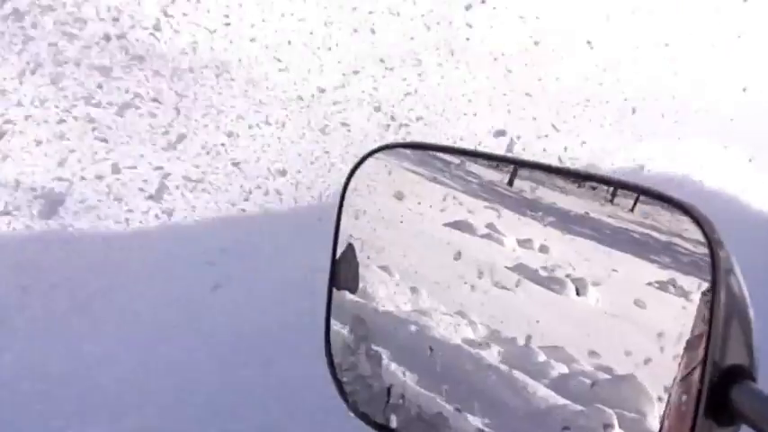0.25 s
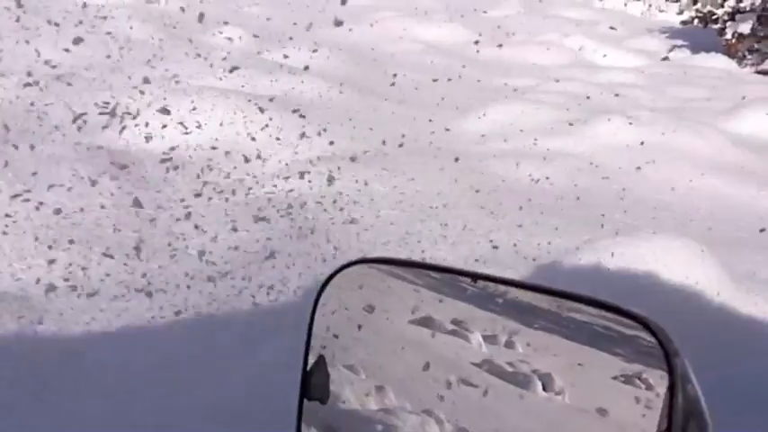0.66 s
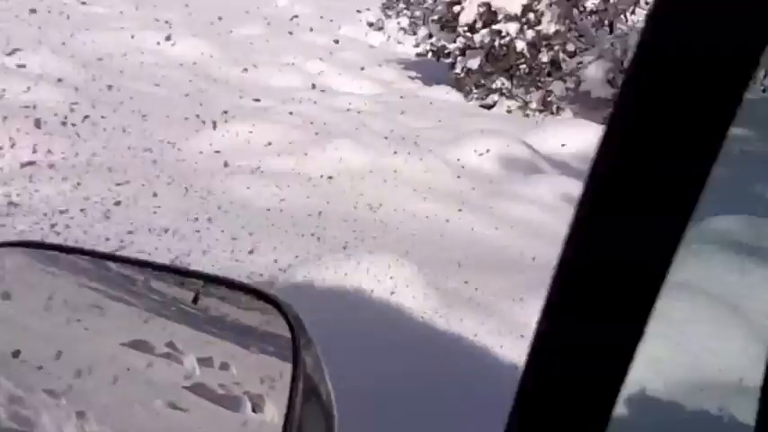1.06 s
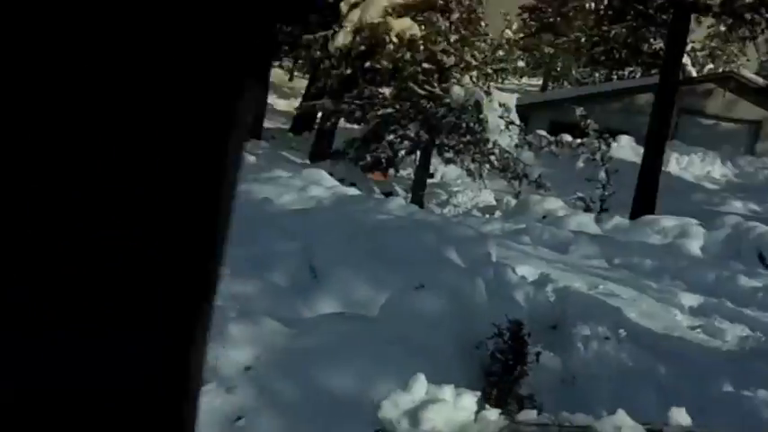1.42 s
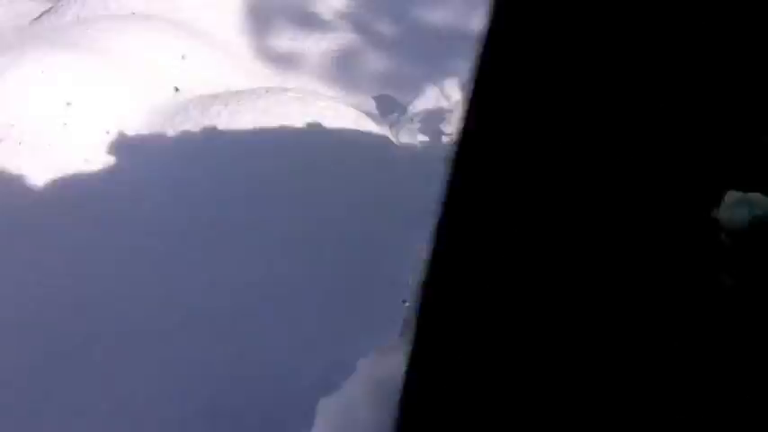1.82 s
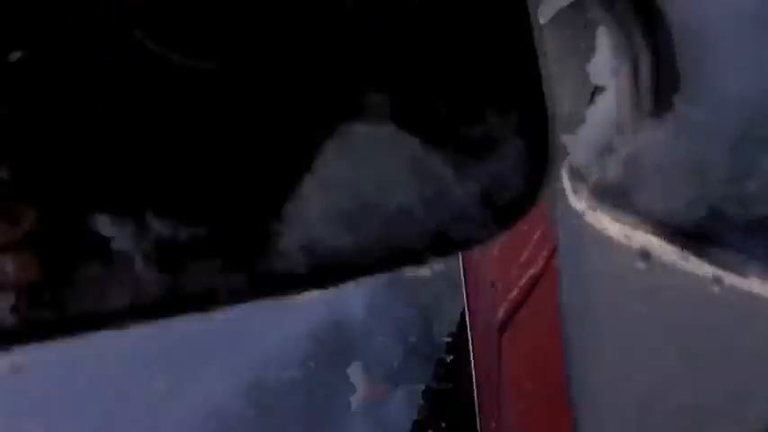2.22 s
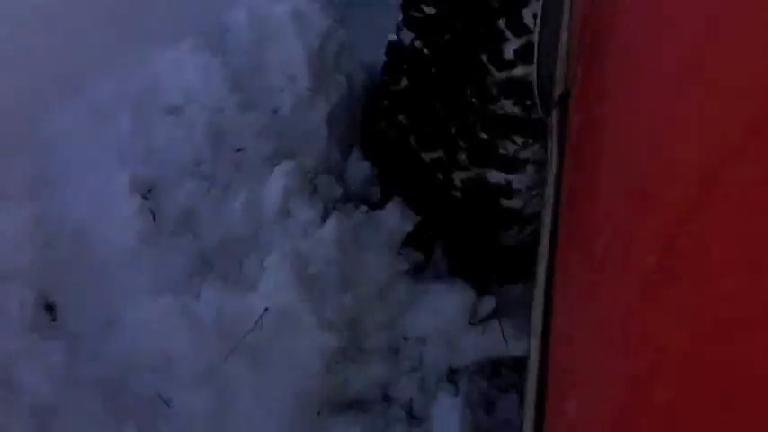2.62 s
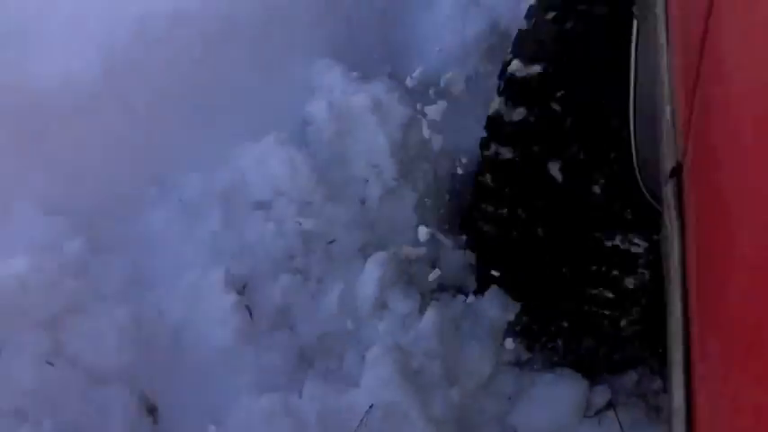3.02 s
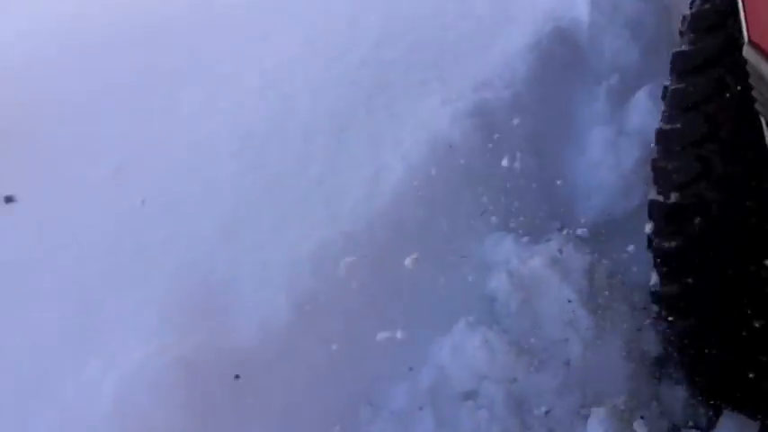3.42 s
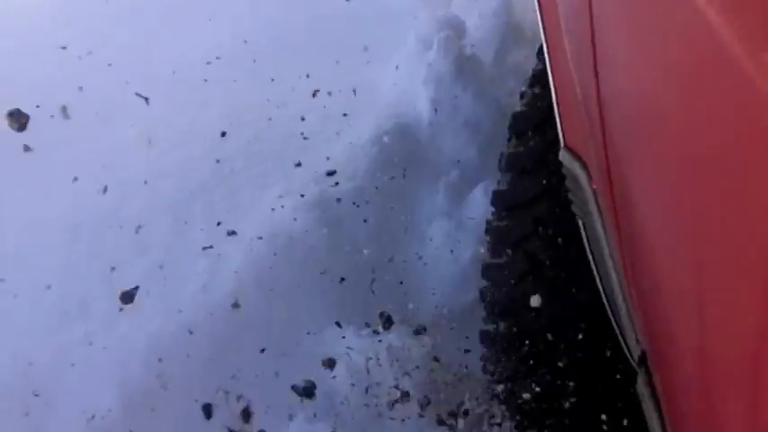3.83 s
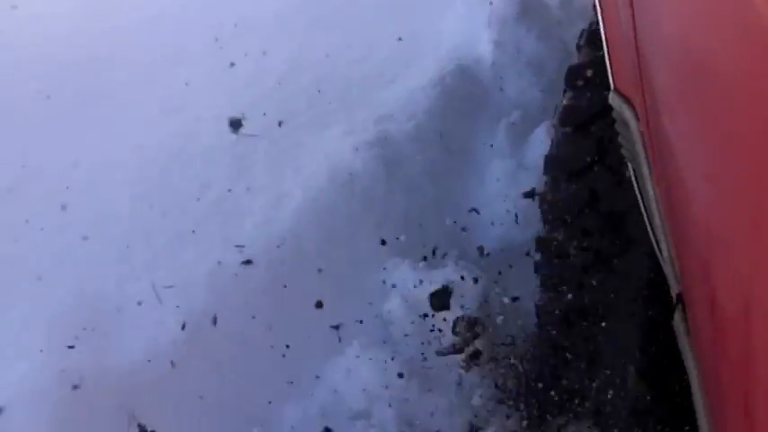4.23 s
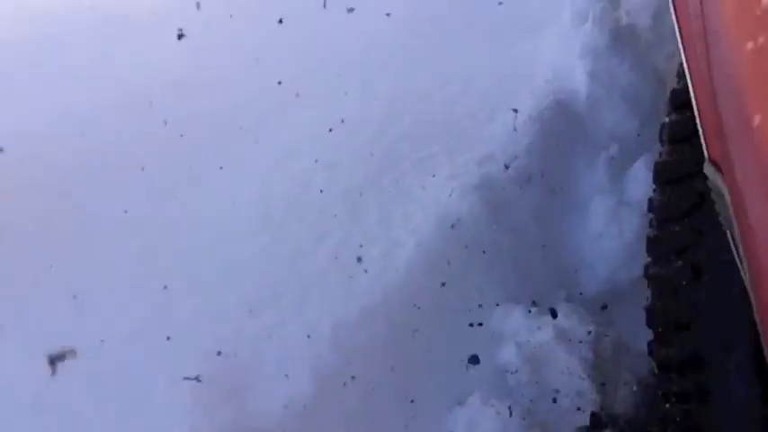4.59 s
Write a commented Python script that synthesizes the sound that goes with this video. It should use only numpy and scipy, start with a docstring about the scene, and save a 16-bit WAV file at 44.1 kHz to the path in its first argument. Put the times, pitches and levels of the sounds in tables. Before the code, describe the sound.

A stuck truck's big engine throbs inside the cab, then outside its spinning tyre churns deep snow and pelts the bodywork with ice and clods.

```python
"""Tyre spinning in deep snow

A V8 pickup is stuck; we hear it first from the cab, then leaning out over the wheel, on one small microphone.
Lines at multiples of the engine cycle make the exhaust burble; noise and sawtooth beats make the cab throb.
Noise and showers of tiny impacts make the tread churn snow and fling ice and grit.
Bursts of noise through panel and wheel-arch resonances make clods smack and lumps thud; a sleeve brushes by."""
import sys
import numpy as np
from scipy import signal
from scipy.fft import rfft, irfft, next_fast_len
from scipy.io import wavfile
from scipy.ndimage import uniform_filter1d, map_coordinates

SR = 44100
rng = np.random.default_rng(int(sys.argv[2]) if len(sys.argv) > 2 else 0)


def store_pcm(level_fs):
    """Save levels as 16-bit WAV."""
    pcm = np.round(np.clip(level_fs, -1, 1) * 32767).astype(np.int16)
    wavfile.write(sys.argv[1], SR, np.atleast_2d(pcm).T)


N = 214145


def amp(db):
    """Decibels to gain."""
    return 10 ** (np.asarray(db) / 20)


def unit(x):
    """Scale to rms 1."""
    return x / np.sqrt(np.mean(x ** 2) + 1e-20)


def curves(rows):
    """One value per sample for each column after the time."""
    s, *cols = np.transpose(rows)
    return [np.interp(np.arange(N) / SR, s, c) for c in cols]


def ramp(span):
    """Rises from 0 to 1 between two times."""
    return np.interp(np.arange(N) / SR, span, [0, 1])


def swells(rows):
    """Bell-shaped rises in dB, one per row."""
    t = np.arange(N) / SR
    return sum(db * np.exp(-((t - s) / half) ** 2) for s, half, db in rows)


def wobble(rate):
    """A smooth random curve, rate knots a second."""
    knots = rng.standard_normal(int(N * rate / SR) + 4)
    return map_coordinates(knots, [np.arange(N) * rate / SR])


def filtered(x, response):
    """x times a response of frequency."""
    m = next_fast_len(len(x) + 8192)
    return irfft(rfft(x, m) * response(np.fft.rfftfreq(m, 1 / SR)), m)[:len(x)]


def resonances(f, rows):
    """Sum of resonances of alternating sign, one per row: pitch_hz, width_hz, level_db."""
    total = 0
    for k, (hz, width, db) in enumerate(rows):
        total = total + (-1) ** k * amp(db) * 1j * f * width / (hz * hz - f * f + 1j * f * width)
    return total


def colour(x, points):
    """Causal filter of unit power that follows (Hz, dB) points and falls off above the last."""
    size = 16384
    hz, db = np.transpose(list(points) + [(2 * points[-1][0], -120)])
    gain = amp(np.interp(np.log(np.fft.rfftfreq(size, 1 / SR) + 1), np.log(hz), db))
    # folding the cepstrum gives minimum phase
    cepstrum = irfft(np.log(gain))
    fold = np.r_[1, np.full(size // 2 - 1, 2), 1, np.zeros(size // 2 - 1)]
    ring = irfft(np.exp(rfft(cepstrum * fold)))
    return signal.fftconvolve(x, ring / np.linalg.norm(ring))[:len(x)]


def grains(rate, spread_db):
    """Random tiny impacts of rms 1, rate a second, with scattered sizes."""
    struck = rng.random(N) < rate / SR
    size = amp(spread_db * np.clip(rng.standard_normal(N), -2, 2))
    return unit(struck * size * rng.choice([-1, 1], N))


def chips(lo_hz, hi_hz, cycles, spread_db, count):
    """Fragments that each ring briefly at their own pitch, many small; as strong in their band as white noise."""
    s, pitch, size, side = rng.random((count, 4)).T[:, :, None]
    hz = lo_hz + (hi_hz - lo_hz) * pitch
    t = np.arange(int(cycles / lo_hz * SR)) / SR
    decay = amp(spread_db * size ** 3 - 60 * hz * t / cycles)
    ring = np.sign(side - .5) * np.sqrt(hz) * decay * np.sin(2 * np.pi * hz * t)
    at = (s * N).astype(int) + np.arange(len(t))
    return unit(np.bincount(at.ravel(), ring.ravel(), N)[:N]) * np.sqrt(2 * abs(hi_hz - lo_hz) / SR)


def add(track, s, sound):
    """Mix a sound into the track at s seconds."""
    part = track[round(s * SR):][:len(sound)]
    part += sound[:len(part)]


# engine speed: start_s, cycle_rate_hz
ENGINE_SPEED = [(0, 18.3), (.22, 19.3), (.35, 19.25), (.46, 18.1), (.58, 16.15), (.7, 14.9), (.92, 13.5),
                (1.6, 13.2), (2.08, 13.27), (2.5, 11.52), (2.62, 11.57), (2.98, 12.85), (3.22, 14.65),
                (3.45, 16.85), (3.58, 17.08), (3.72, 16.75), (3.82, 15.35), (3.96, 13.9), (4.15, 12.9),
                (4.86, 11.85)]
# throttle, as engine load: start_s, load_db
THROTTLE = [(.45, 2.5), (.9, -8.5), (1.5, -1), (2.0, 2.5), (2.8, -.5), (3.05, 1.5), (3.25, 1), (3.7, -1.5),
            (4.05, -4.5), (4.3, -1), (4.86, 0)]
# weaker exhaust lines: cycle_multiple, level_db (before their common weak level)
WEAK_LINES = [(3, -12), (4, -19), (6, -15), (7, -13), (9, -21), (11, -18), (13, -20), (14, -26),
              (15, -23.5)]
# strength of a line at its pitch, beside the truck and inside the cab: pitch_hz, level_db
PIPE_BESIDE = [(56, -29), (65, -21), (73, -24), (84, -22.5), (92, -19.5), (100, -23), (110, -32.5),
               (130, -23.5), (170, -33.5)]
PIPE_FROM_CAB = [(62, -44.5), (67, -44.5), (76, -46), (94, -29), (106, -34), (113, -34.5), (135, -35.5),
                 (155, -41.5), (190, -38.5)]


def exhaust(revs, load_db, outside, octave_db=-5, weak_db=-22, weak_in_cab_db=-13):
    """Eight firings a cycle; the uneven order of each bank adds a strong fifth line, its octave and weaker lines."""
    turn = np.cumsum(revs) / SR

    def line(order, waver_db):
        phase = 2 * np.pi * (order * turn + rng.random()) + .09 * wobble(25)
        return np.sqrt(2) * np.sin(phase) * amp(waver_db * wobble(14))

    def level(order):
        # a strong line swells as the revs carry it through the resonances of the pipe and the cab
        beside_db = np.interp(order * revs, *np.transpose(PIPE_BESIDE))
        from_cab_db = np.interp(order * revs, *np.transpose(PIPE_FROM_CAB))
        return amp(load_db + outside * beside_db + (1 - outside) * from_cab_db)

    burble = level(order=5) * line(5, waver_db=.8)
    firing = level(order=8) * line(8, waver_db=.8)
    octave = amp(octave_db) * level(order=10) * line(10, waver_db=.8)
    weak = sum(amp(db) * line(round(multiple), waver_db=3.5) for multiple, db in WEAK_LINES)
    return burble + firing + octave + amp(weak_db + weak_in_cab_db * (1 - outside)) * weak


# pace of the throb in the cab: start_s, beat_rate_hz
BEAT_PACE = [(0, 9.15), (.55, 9.05), (.72, 9.8), (1.05, 9.8), (1.18, 8.87), (1.4, 8.87), (1.6, 8.47),
             (2.0, 8.5), (2.15, 10)]
FIRST_BEAT_S = 0.03


def count_beats():
    """Running count of the cab's beats, whole at each beat."""
    pace, = curves(BEAT_PACE)
    return np.cumsum(pace) / SR - FIRST_BEAT_S * pace[0]


# lines of the throb: beat_multiple, smooth_level_db, shudder_level_db
THROB_LINES = [(1, -17, -20.5), (2, -27.5, -22), (3, -50, -36), (4, -46, -40), (5, -50, -42.5),
               (6, -48, -43.5)]
# the smooth throb hardens to a shudder: start_s, end_s
HARDENING_S = (0.97, 1.27)
THROB_OUTSIDE_DB = -15  # against inside


def cab_throb(beats, outside):
    """Air in the shaking cab throbs in sawtooth beats, a sum of harmonics of the beat."""
    shudder = ramp(HARDENING_S)
    throb = 0
    for k, smooth_db, hard_db in THROB_LINES:
        gain = amp(smooth_db + (hard_db - smooth_db) * shudder)
        throb = throb + gain * np.sin(2 * np.pi * round(k) * beats)
    return amp(THROB_OUTSIDE_DB * outside) * np.sqrt(2) * throb


# spectrum of the microphone's crackle: pitch_hz, level_db
CRACKLE_SPECTRUM = [(200, -5), (700, 5), (3000, -14), (5000, -23), (12000, -24)]
CRACKLE_DB = -58


def overload_crackle(beats, outside, lead=0.16):
    """In the cab the small microphone crackles as it overloads on each beat of the throb: gated grains."""
    gate = np.exp(-(((beats + lead + .5) % 1 - .5) / .08) ** 2)
    crackle = unit(amp(1.5 * wobble(8)) * colour(grains(rate=1800, spread_db=3), CRACKLE_SPECTRUM))
    return amp(CRACKLE_DB) * (1 - outside) * gate * crackle


def lugging(revs, outside):
    """How far the engine lugs at low revs, as felt in the cab, 0 to 1."""
    return (1 - outside) * (revs.max() - revs) / np.ptp(revs)


# spectrum of the low rumble: pitch_hz, level_db
RUMBLE_SPECTRUM = [(10, -29), (22, -7), (36, 9), (55, -5), (85, -6), (130, -15.5), (220, -38)]
# base level and rise when lugging (dB), then dB per dB of load
RUMBLE_DB, RUMBLE_LUG_DB, RUMBLE_PER_LOAD = -31.5, 8, 0.92
# the harder the tyre bites, the more it shakes the truck (dB per dB); outside against inside (dB)
RUMBLE_PER_BITE, RUMBLE_OUTSIDE_DB = 0.14, -0.5


def cab_rumble(revs, load_db, bite_db, beats, outside, pump_db=0.5):
    """Low noise that pumps with the beats inside the cab and grows as the engine lugs."""
    level_db = RUMBLE_DB + RUMBLE_LUG_DB * lugging(revs, outside) + RUMBLE_PER_LOAD * load_db
    level_db = level_db + RUMBLE_PER_BITE * bite_db + RUMBLE_OUTSIDE_DB * outside
    pump = amp(pump_db * (1 - outside) * np.cos(2 * np.pi * beats))
    return amp(level_db) * unit(colour(rng.standard_normal(N) * pump, RUMBLE_SPECTRUM))


# spectrum of the body drone: pitch_hz, level_db
DRONE_SPECTRUM = [(50, -20), (100, -15), (140, -10), (175, 2.5), (220, -4), (320, -18), (800, -47.5)]
# base level and rise when lugging (dB), then dB per dB of load and of bite
DRONE_DB, DRONE_LUG_DB, DRONE_PER_LOAD, DRONE_PER_BITE = -34.5, 11, 0.4, 0.92
DRONE_PER_SLAB = 0.35  # a dragged slab also booms through the body (dB per dB of swell)


def body_drone(revs, load_db, bite_db, outside):
    """The body drones: noise that pulses in step with the firings."""
    level_db = DRONE_DB + DRONE_LUG_DB * lugging(revs, outside) + DRONE_PER_LOAD * load_db
    level_db = level_db + DRONE_PER_BITE * bite_db + DRONE_PER_SLAB * swells(DRAGGED_SLABS)
    firing = 1 + .45 * np.cos(2 * np.pi * 8 * np.cumsum(revs) / SR)
    return amp(level_db) * unit(colour(rng.standard_normal(N) * firing, DRONE_SPECTRUM))


# spectrum of the fan and intake: pitch_hz, level_db
FAN_SPECTRUM = [(500, 0.5), (1000, 5.5), (1400, -5), (2100, -5.5), (3200, -17), (4500, -22), (7000, -18),
                (12000, -25)]
FAN_DB, FAN_PER_LOAD = -60, 0.68  # base level (dB), dB per dB of load


def fan_and_intake(load_db):
    """The engine's fan and intake add a fine, even rush that follows the throttle."""
    return amp(FAN_DB + FAN_PER_LOAD * load_db) * unit(colour(rng.standard_normal(N), FAN_SPECTRUM))


# how hard the tread digs in: start_s, bite_db (against a full bite)
TREAD_BITE = [(0, -13), (.45, -10), (.75, -17), (1.1, -19.5), (1.9, -12.5), (2.15, -10), (2.33, -12),
              (2.5, -8), (2.79, -8), (2.87, -1), (3.5, 0.5), (3.99, 0.5), (4.07, -8.5), (4.2, 0),
              (4.42, -0.5), (4.54, -5.5), (4.86, -6)]
# slabs of snow dragged under the tread: centre_s, half_length_s, swell_db
DRAGGED_SLABS = [(2.5, 0.08, 3), (2.69, 0.025, 6.5), (3.52, 0.028, 3.5), (4.205, 0.042, 6),
                 (4.64, 0.047, 7), (4.83, 0.038, 5.5)]
# spectrum of the churned snow: pitch_hz, level_db
CHURN_SPECTRUM = [(120, -22), (220, -3.5), (270, -3.5), (340, 0), (400, -6), (450, -4.5), (510, -8.5),
                  (640, -7.5), (980, -15), (1250, -24), (2000, -29.5)]
# level at a full bite (dB), dB per dB of bite, change in the cab (dB)
CHURN_DB, CHURN_PER_BITE, CHURN_IN_CAB_DB = -33, 0.9, -1


def snow_churn(bite_db, clumps, outside, chunks_db=-2):
    """Tread blocks tear the snow in clumps: small grains, and larger ringing chunks heard outside."""
    level_db = CHURN_DB + CHURN_PER_BITE * bite_db + CHURN_IN_CAB_DB * (1 - outside) + swells(DRAGGED_SLABS)
    chunks = amp(chunks_db) * chips(lo_hz=265, hi_hz=1386, cycles=11.0, spread_db=8, count=1500)
    tearing = amp(outside * (1.5 * clumps + 1.5 * wobble(130)))
    torn = (grains(rate=9000, spread_db=3) + outside * chunks) * tearing
    return amp(level_db) * unit(colour(torn, CHURN_SPECTRUM))


# spectra of coarse spray, fine ice and brightest powder, and the cab's dulling: pitch_hz, level_db
SPRAY_SPECTRUM = [(400, -46.5), (900, 8), (1400, 3.5), (2000, 4), (2800, 0), (4200, -2.5), (5500, -16.5),
                  (8000, -24.5)]
ICE_SPECTRUM = [(2000, -5.5), (4000, -9.5), (6000, 0), (7300, -3.5), (9000, -11.5), (11000, -16.5),
                (13000, -17.5), (15000, -34.5)]
POWDER_SPECTRUM = [(5000, -5), (8500, 12.5), (10500, -12.5), (13000, -19), (15000, -29)]
CAB_MUFFLE = [(1500, -2.5), (2500, -2), (4500, -5), (9000, -31)]
# patches of ice and grit ripped loose: centre_s, half_length_s, swell_db
ICE_SHOWERS = [(3.98, 0.069, 6), (4.42, 0.075, 3.5)]
# the tread wears through the snow to the dirt: start_s, end_s
REACHES_DIRT_S = (3.77, 3.79)
SPRAY_DB = -42.5  # at a full bite
# level at a full bite (dB), dB per dB of bite, changes in the cab and on dirt (dB)
ICE_DB, ICE_PER_BITE, ICE_IN_CAB_DB, ICE_ON_DIRT_DB = -47, 1, -7, 2.5
ICE_TOP_REVS_DB = -0.5  # further change in the cab at top revs


def spray_and_ice(revs, bite_db, clumps, outside, powder_db=-10.0, powder_growth=2.2, window_db=-13,
                  clump_db=1.66, flutter_db=1.34):
    """The tread throws off showers of noise and ringing fragments, louder the harder it bites."""
    fast = (revs - revs.min()) / np.ptp(revs)
    shelter_db = (1 - outside) * (ICE_IN_CAB_DB + ICE_TOP_REVS_DB * fast)
    ice_db = ICE_DB + ICE_PER_BITE * bite_db + shelter_db
    ice_db = ice_db + ICE_ON_DIRT_DB * ramp(REACHES_DIRT_S) + swells(ICE_SHOWERS)
    pellets = .9 * chips(lo_hz=1200, hi_hz=5200, cycles=17, spread_db=12, count=4500)
    splinters = .8 * chips(lo_hz=4000, hi_hz=14000, cycles=20, spread_db=11, count=9000)
    # coarse grit and fine ice leave the tread in the same short bursts
    bursts = amp(outside * (clump_db * clumps + flutter_db * wobble(260)))

    def shower(spectrum, pieces):
        return unit(colour((rng.standard_normal(N) + outside * pieces) * bursts, spectrum))

    spray = shower(SPRAY_SPECTRUM, pellets)
    # the cab dulls the spray, but for what comes through the open window
    direct = np.clip(outside + amp(window_db) * (1 - outside), 0, 1)
    spray = direct * spray + (1 - direct) * unit(colour(spray, CAB_MUFFLE))
    ice = amp(ice_db) * shower(ICE_SPECTRUM, splinters)
    # the hardest throws shatter the ice to a brighter powder
    loudest_db = ice_db.max()
    powder_level = amp(loudest_db + powder_db + powder_growth * (ice_db - loudest_db))
    return amp(SPRAY_DB + bite_db) * spray + ice + powder_level * shower(POWDER_SPECTRUM, 0)


GRIT_DB, GRIT_ON_DIRT_DB = -62, 13  # level at a full bite, rise once the dirt is reached


def grit_patter(bite_db, outside, grit_per_bite=0.83, in_cab_db=-66):
    """Bits of grit tick on panels, each at its own pitch; inside the cab only a faint, dull patter remains."""
    ticks = chips(lo_hz=1800, hi_hz=11000, cycles=10, spread_db=18, count=1000)
    # the patter follows the bite smoothed over a quarter second, so it bridges the lulls
    smoothed_bite_db = uniform_filter1d(bite_db, SR // 4)
    grit_db = GRIT_DB + grit_per_bite * smoothed_bite_db + GRIT_ON_DIRT_DB * ramp(REACHES_DIRT_S)
    dull = chips(lo_hz=900, hi_hz=3800, cycles=5, spread_db=9, count=350)
    return outside * amp(grit_db) * unit(ticks) + (1 - outside) * amp(in_cab_db) * unit(dull)


# clods and stones on the bodywork: start_s, level_db (before the common trim), pitch_hz, spread_octaves, t60_s
BODY_CLODS = [(1.4078, -31, 9000, 1.6, .004), (1.4303, -22.5, 5650, 0.42, 0.014),
              (1.431, -33.5, 2000, 0.91, 0.021), (1.5912, -40, 3630, 0.66, 0.013),
              (1.685, -40, 4620, 0.83, 0.0088), (2.0893, -34, 7000, 0.89, 0.0043),
              (2.5273, -17.5, 5500, 0.49, 0.01), (3.1553, -26.5, 3550, 0.71, 0.021),
              (3.3249, -27.5, 6750, 0.45, 0.026), (3.365, -33, 7660, 0.22, 0.021),
              (3.425, -24.5, 5900, 0.42, 0.028), (3.5213, -21, 6140, 0.35, 0.023),
              (3.579, -24, 7340, 0.25, 0.016), (3.6776, -33, 8550, 0.48, 0.012),
              (3.727, -24, 6200, 0.48, 0.015), (3.887, -28, 8100, 1, 0.0079),
              (3.9143, -26.5, 8000, 0.12, 0.025), (3.955, -22, 7000, 0.31, 0.013),
              (3.974, -13, 4850, 1.6, 0.014), (3.9824, -25, 7500, 0.45, 0.017),
              (4.001, -17.5, 7300, 0.18, 0.024), (4.014, -35, 6100, 0.51, .02),
              (4.049, -23.5, 6260, 0.22, 0.02), (4.135, -17, 5100, 0.89, 0.018),
              (4.198, -20, 3000, 1, 0.011), (4.2448, -21.5, 5500, 0.73, 0.035),
              (4.3647, -22, 5240, 0.81, 0.019), (4.399, -24, 3570, 0.69, 0.017),
              (4.422, -23, 9250, 1.2, .008), (4.462, -24, 5930, 0.84, 0.011),
              (4.477, -25, 7850, 0.27, 0.0087), (4.4868, -21, 8400, 0.39, 0.0071),
              (4.5113, -18.5, 5850, 1.0, 0.03), (4.5744, -22, 6860, 0.59, 0.033),
              (4.62, -25.5, 6800, 0.7, 0.015), (4.674, -21.5, 3720, 0.68, 0.027),
              (4.7282, -12.5, 6640, 0.42, 0.0061), (4.733, -22.5, 6760, 1, 0.0096),
              (4.7822, -29.5, 6950, 0.3, 0.0087)]


def clods(crumble_t60=0.05, crumble_db=-21, grit_db=3, skirt_db=-24, crack=0.48, trim_db=-8.5):
    """Each clod smacks a different spot of the panels with a sharp crack and sheds a short trail of crumbs."""
    smacks = np.zeros(N)
    t = np.arange(SR // 10) / SR
    bands = np.geomspace(250, 15000, 32)
    for s, db, hz, octaves, t60 in BODY_CLODS:
        shape = amp(-60 * t / t60) + amp(crumble_db - 60 * t / crumble_t60)
        pieces = np.interp(t, np.linspace(0, t[-1], 120), rng.standard_normal(120))
        broken = unit(shape * amp(grit_db * pieces) * rng.standard_normal(len(t)))
        smack = broken * np.sqrt(np.mean(shape ** 2))
        smack[0] += crack * np.linalg.norm(smack)
        power = (np.exp(-(np.log2(bands / hz) / octaves) ** 2) + amp(skirt_db) ** 2) / bands
        panel_db = 10 * np.log10(power / power.max()) + rng.standard_normal(len(bands))
        add(smacks, s, amp(db + trim_db) * colour(smack, list(zip(bands, panel_db))))
    return smacks


# resonances of the door trim: pitch_hz, width_hz, level_db
DOOR_TRIM = [(590, 57, 1), (946, 54, 2.5), (1336, 90, -14), (1860, 130, -13.5), (2630, 140, -18.5),
             (3900, 500, -24)]
KNOCK_S, KNOCK_DB = 1.4785, -27.5  # start, peak


def door_knock(contact_t60=0.011, tail_db=-24, tail_t60=0.1):
    """Something knocks once on the door trim: a click and decaying noise ring its resonances."""
    track = np.zeros(N)
    t = np.arange(SR // 8) / SR
    decay = amp(-60 * t / contact_t60) + amp(tail_db - 60 * t / tail_t60)
    contact = decay * rng.standard_normal(len(t))
    click = 2 * (t == 0)
    knock = filtered(contact / np.linalg.norm(contact) + click, lambda f: resonances(f, DOOR_TRIM))
    add(track, KNOCK_S, amp(KNOCK_DB) * knock / np.abs(knock).max())
    return track


# spectrum of a sleeve on the window frame: pitch_hz, level_db
SLEEVE = [(150, -9.5), (228, 9), (275, -6.5), (345, 0.5), (480, -10.5), (900, -14.5), (1300, -24.5),
          (2000, -36.5)]
BRUSH_S, BRUSH_DB, BRUSH_RISE_S, BRUSH_FALL_S = 2.117, -27.5, .045, .048  # centre, level, half lengths


def sleeve_brush():
    """A sleeve brushes over the window frame: coloured noise that swells and fades."""
    since = np.arange(N) / SR - BRUSH_S
    swell = 1 / (1 + (since / np.where(since < 0, BRUSH_RISE_S, BRUSH_FALL_S)) ** 4)
    return amp(BRUSH_DB) * swell * unit(colour(rng.standard_normal(N), SLEEVE))


# heavy lumps of snow on the truck: start_s, level_db (before trim and softening), hardness_db
SNOW_LUMPS = [(2.929, -13, -18), (3.05, -14, -23), (3.247, -11.5, -32), (3.501, -10, -15)]
# resonances of the hollow wheel arch: pitch_hz, width_hz, level_db (before the tilt for hardness)
WHEEL_ARCH = [(207, 21, 2), (342, 57, 8.5), (473, 290, -1), (610, 98, 0.5), (920, 300, -18)]


def lumps(t60=0.031, attack=0.001, trim_db=-5.0):
    """Packed snow thuds into the hollow of the wheel arch; harder lumps wake its higher resonances."""
    thuds = np.zeros(N)
    t = np.arange(SR // 8) / SR
    for s, db, hard_db in SNOW_LUMPS:
        tilt = (hard_db + 16.0) / 2  # dB per octave about 450 Hz
        arch = [(hz, width, level + tilt * np.log2(hz / 450)) for hz, width, level in WHEEL_ARCH]
        blow = amp(-60 * t / t60) * (1 - np.exp(-t / attack)) * rng.standard_normal(len(t))
        thud = filtered(blow, lambda f: resonances(f, arch))
        add(thuds, s, amp(db + trim_db) * thud / np.abs(thud).max())
    # soft snow leaves no sharp edge on the blow
    return filtered(thuds, lambda f: 1 / (1 + (f / 2800) ** 4))


# the microphone leans out and bends down towards the wheel and the exhaust: start_s, end_s
LEANING_S = (2.18, 2.464)
# the tyre comes clear through the window: start_s, end_s
THROUGH_WINDOW_S = (1.89, 2.044)


def scene():
    """Engine, cab and tyre at one microphone, alike in both channels."""
    revs, load_db, bite_db = curves(ENGINE_SPEED)[0], curves(THROTTLE)[0], curves(TREAD_BITE)[0]
    leaning, at_window = ramp(LEANING_S), ramp(THROUGH_WINDOW_S)
    beats, clumps = count_beats(), wobble(45)
    engine = exhaust(revs, load_db, leaning) + fan_and_intake(load_db)
    cab = cab_throb(beats, leaning) + overload_crackle(beats, leaning)
    cab += cab_rumble(revs, load_db, bite_db, beats, leaning) + body_drone(revs, load_db, bite_db, leaning)
    tyre = snow_churn(bite_db, clumps, at_window) + spray_and_ice(revs, bite_db, clumps, at_window)
    debris = grit_patter(bite_db, leaning) + clods() + lumps()
    mono = engine + cab + tyre + debris + door_knock() + sleeve_brush()
    return np.array([mono, mono])


NOTCH_HZ, TOP_HZ = 5445, 15100


def record(dry, notch_width_hz=800):
    """The small microphone has a deep notch in its treble, a soft top end and a steep band limit."""
    def response(f):
        off_notch = NOTCH_HZ ** 2 - f * f
        notch = off_notch / (off_notch + 1j * f * notch_width_hz)
        top_end = (f < TOP_HZ) / np.sqrt(1 + (f / 11300) ** 12)
        return notch ** 2 * top_end

    return np.array([filtered(x, response) for x in dry])


dry = scene()
out = record(dry)
store_pcm(out)
```